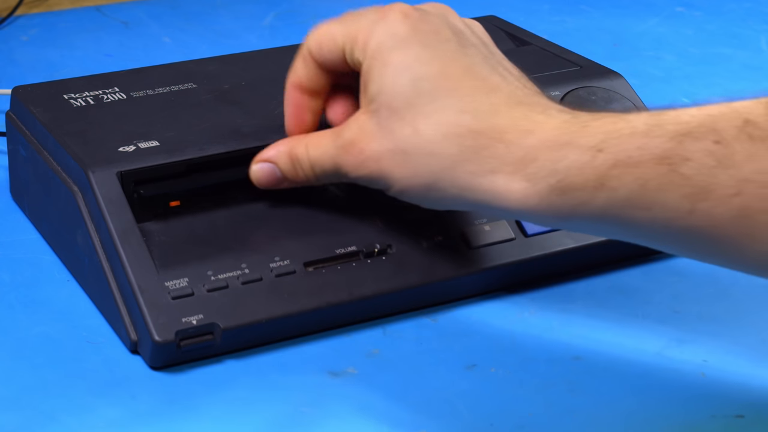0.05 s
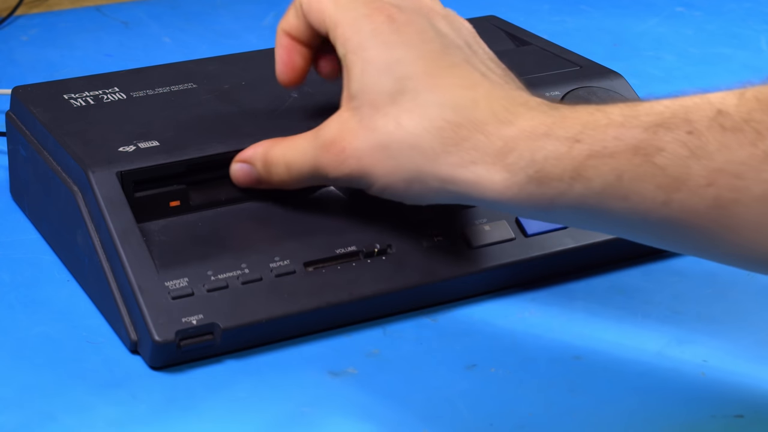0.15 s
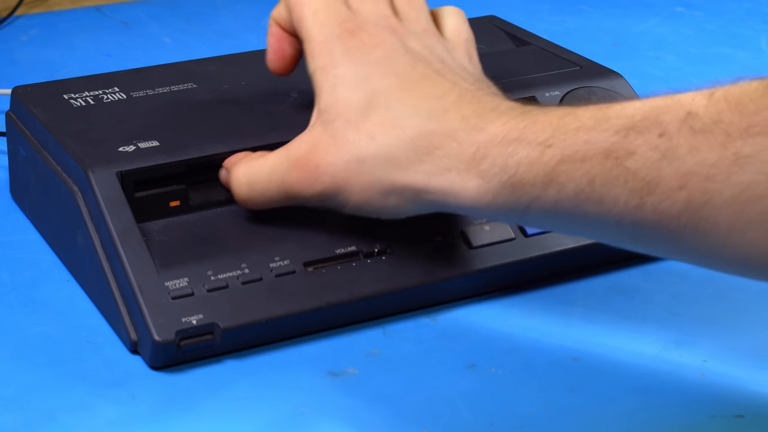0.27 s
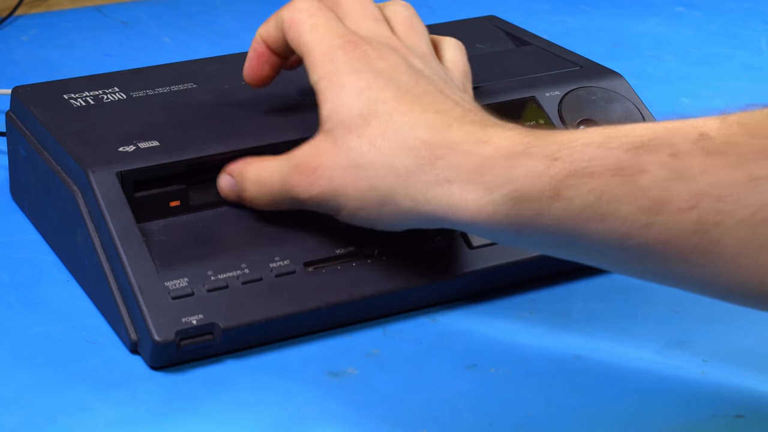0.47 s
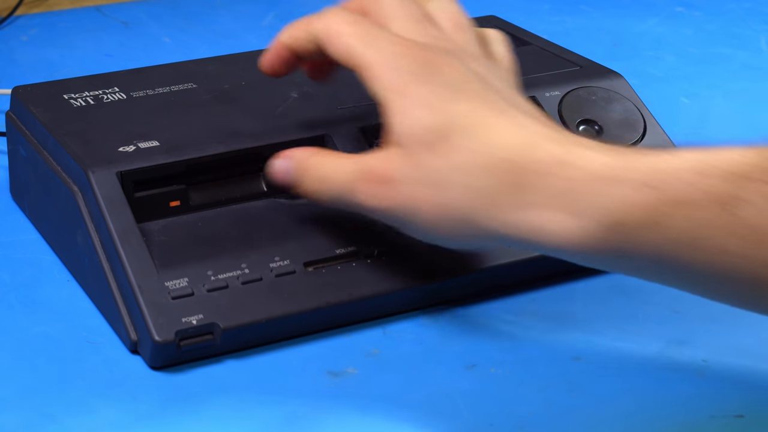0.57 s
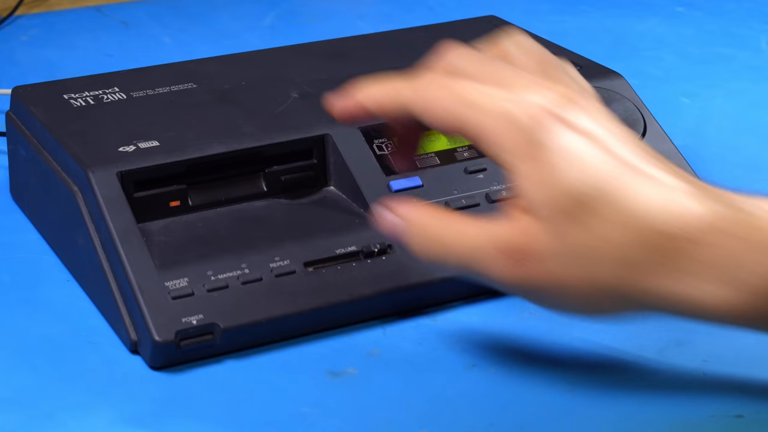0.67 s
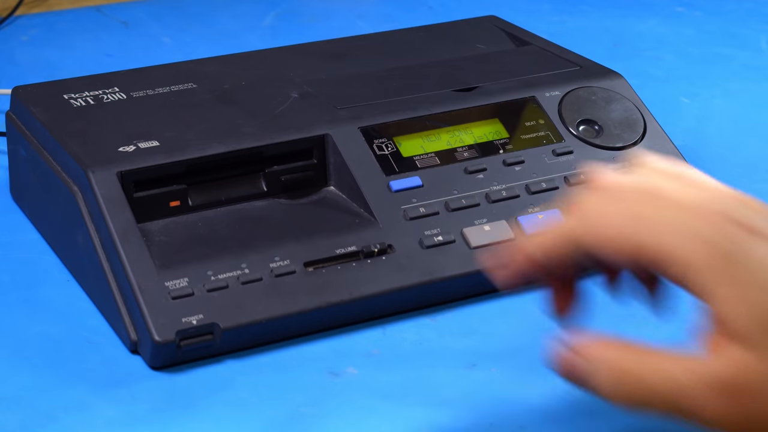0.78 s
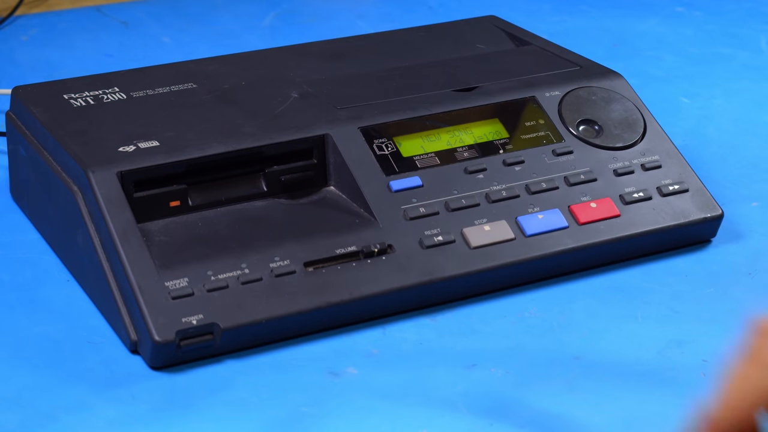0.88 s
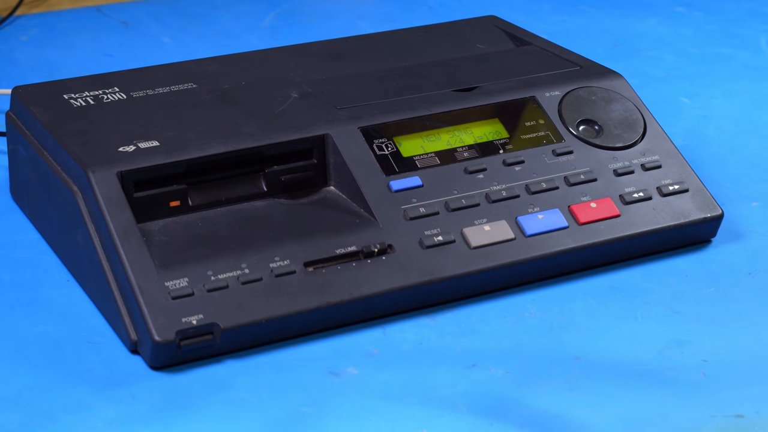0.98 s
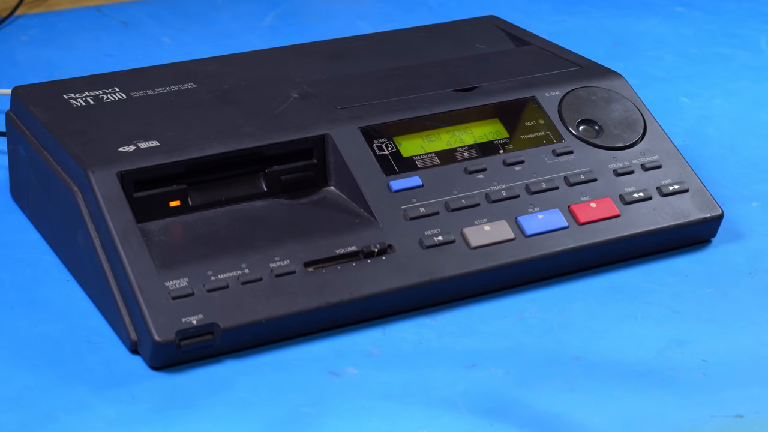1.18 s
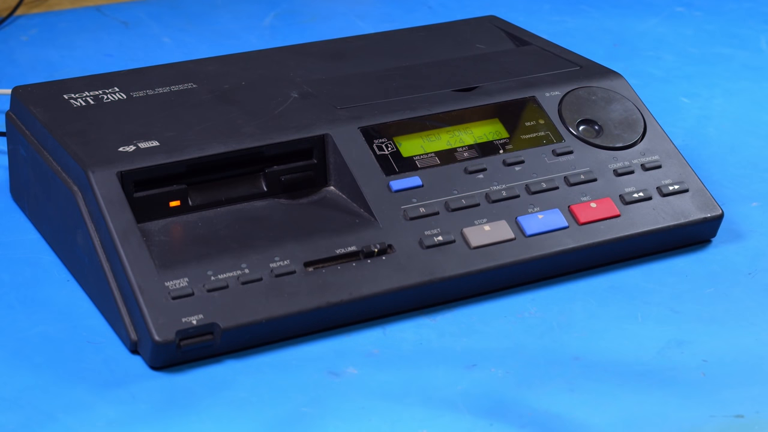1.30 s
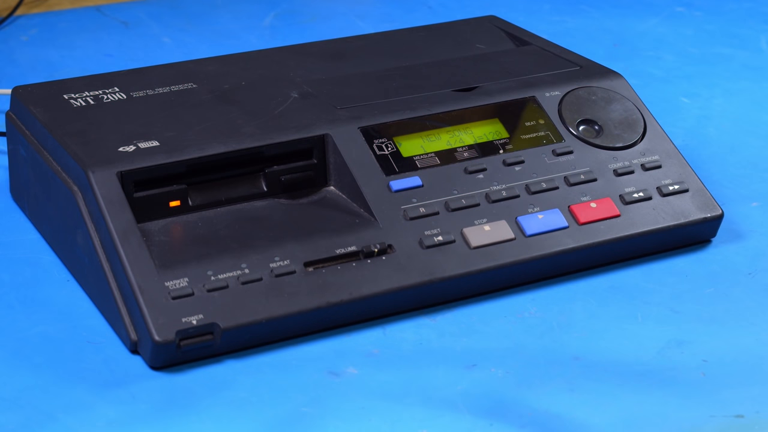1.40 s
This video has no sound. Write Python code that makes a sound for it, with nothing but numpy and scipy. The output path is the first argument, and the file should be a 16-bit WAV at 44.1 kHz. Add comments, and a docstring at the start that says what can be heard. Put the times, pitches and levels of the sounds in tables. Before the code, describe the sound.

Close by in a small quiet room, a floppy disk scrapes into a drive and locks with a sharp clack and a smaller click. A faint spinning hum follows, then a light clunk and quick, quiet stepping buzzes.

```python
"""A small quiet room, close to a plastic desktop unit, over the rumble of a wobbling microphone stand.
A floppy disk rubs and knocks into the drive, its shutter pings open, the carrier drops it into
place with a clack that rings the case, and the eject button clicks out. The spindle hums and the
disk swishes in its sleeve. Then the head clunks in and its motor steps in a few short bursts."""
import sys
import numpy as np
from scipy import signal
from scipy.fft import rfft, irfft
from scipy.io import wavfile

SR = 44100
rng = np.random.default_rng(int(sys.argv[2]) if len(sys.argv) > 2 else 0)


def persist_wave(psi):
    """Save psi, clipped to +-1, as 16-bit WAV."""
    counts = np.round(np.clip(psi, -1, 1) * 32767).astype(np.int16)
    wavfile.write(sys.argv[1], SR, np.atleast_2d(counts).T)


N = 63945
ATTACK_S = .00065  # onset of a hard contact


def undb(db):
    """Decibels to gain."""
    return 10 ** (np.asarray(db) / 20)


def unit(x):
    """Scale to rms 1."""
    return x / np.sqrt(np.mean(x ** 2))


def since(start):
    """Seconds since a moment, zero before it."""
    return np.maximum(np.arange(N) / SR - start, 0)


def fade(t, t60):
    """Exponential decay, 60 dB in t60 seconds."""
    return np.exp(-np.log(1000) * t / np.maximum(t60, 1e-3))


def fader(points):
    """Gain over time from (s, dB) points, opening in the 50 ms before the first."""
    s, db = np.array(points).T
    return undb(np.interp(since(0), s, db)) * np.clip(1 + (since(0) - s[0]) * 20, 0, 1)


def bins():
    """Frequencies of the spectrum in Hz."""
    return np.maximum(np.fft.rfftfreq(N, 1 / SR), 1)


def eq(points):
    """Gain across the spectrum from (Hz, dB) points."""
    hz, db = np.array(points).T
    return undb(np.interp(np.log(bins()), np.log(hz), db))


def peak(hz, width_hz):
    """Spectrum of one resonance."""
    return 1 / (1 + (2 * (bins() - hz) / width_hz) ** 2)


def noise(gain):
    """Noise of rms 1 with the given spectrum."""
    return unit(irfft(gain * np.exp(2j * np.pi * rng.random(N // 2 + 1)), N))


def wavering(lines):
    """Narrow resonances fed by noise: tones that waver."""
    return noise(sum(undb(db) / np.sqrt(width) * peak(hz, width) for hz, width, db in lines))


def ring(gain, start, t60, slope=0):
    """Many close modes as dying noise; t60 holds at 2 kHz, and slope lets lower octaves last longer."""
    spectrum, t = rfft(noise(gain)), since(start)
    octave = np.clip(np.log2(bins() / 2000), -4, 3)
    out = 0
    for k in range(-4, 4):
        band = irfft(spectrum * np.maximum(1 - abs(octave - k), 0), N)
        out += band * fade(t, t60 * 2 ** (-k * slope))
    return out * (1 - np.exp(-t / ATTACK_S))


def modes(table, start, attack):
    """Decaying sines of alternating polarity, set off by one blow."""
    t = since(start)
    tones = sum((-1) ** k * undb(db) * np.sin(2 * np.pi * hz * t) * fade(t, t60)
                for k, (hz, db, t60) in enumerate(table))
    return tones * (1 - np.exp(-t / attack))


def knocks(table, colour):
    """Hard contacts on one part, each with its own weight of bass and treble."""
    out = 0
    for start, db, bass_db, treble_db, t60 in table:
        tilt = eq([(350, bass_db), (1800, 0), (9000, treble_db)])
        out += undb(db) * ring(eq(colour) * tilt, start, t60, slope=.22)
    return out


def rub(levels, colour, rough_db, grain_hz):
    """Friction noise that catches and slips."""
    grip = np.interp(since(0) * grain_hz, np.arange(N), rng.standard_normal(N))
    return fader(levels) * unit(noise(eq(colour)) * undb(rough_db * grip))


# Swells of the stand's rumble. Each row: time in seconds, level in dB.
RUMBLE = [(0, -49.5), (.07, -52), (.19, -55.5), (.3, -50), (.5, -47.5), (.6, -56.5), (.8, -55.5),
          (.87, -65), (1.45, -67.5)]
# Its sub-heavy tone. Each row: frequency in Hz, gain in dB.
RUMBLE_EQ = [(10, -13), (21, -1.5), (32, -8), (60, -16.5), (90, -29), (130, -37.5), (300, -52.5),
             (800, -87)]
# The low thump. Each row: pitch in Hz, level in dB, t60 in seconds.
THUMP_MODES = [(22.2, -37, 0.9), (48, -33.5, .2), (64, -32.5, 0.16), (84.6, -36, 0.2)]


def stand_rumble():
    """Low rumble of a wobbling microphone stand, with a thump under the clack."""
    return fader(RUMBLE) * noise(eq(RUMBLE_EQ)) + modes(THUMP_MODES, start=.2, attack=.006)


# Dark room tone. Each row: frequency in Hz, gain in dB.
AIR_EQ = [(30, 0), (70, -2), (140, -12), (400, -11), (700, -24), (1500, -32), (5000, -33), (16000, -37)]


def air():
    """Still air lays a faint, steady bed of noise."""
    return undb(-77.5) * noise(eq(AIR_EQ))


# Fader ride of the hum. Each row: time in seconds, level in dB.
HUM = [(0, -69), (.3, -62.5), (.5, -62.5), (.7, -70), (.85, -71), (.92, -77), (1.05, -75.5), (1.45, -79.5)]
# Its low tones. Each row: pitch in Hz, width in Hz, relative level in dB.
HUM_LINES = [(249, 16, -7), (287, 18, -7), (354.6, 8.2, 0), (398, 18, -11.5), (460, 23, -11.5)]


def spindle_hum():
    """The spindle hums in a wavering cluster of tones."""
    return fader(HUM) * wavering(HUM_LINES)


# Ticks in the slot. Each row: start in seconds, level, bass and treble in dB, t60 in seconds.
SLOT_KNOCKS = [(.0005, -54, -14, -4.5, 0.088), (.0275, -42.5, -10.5, 9, 0.049), (.0335, -44, -4, -2, 0.028),
               (.0438, -36, -4.5, -5, 0.025), (.0475, -44.5, -0.5, -3.5, 0.062),
               (.1125, -69.5, -0.5, 14.5, 0.017), (.1288, -51.5, -2.5, -1.5, 0.048),
               (.183, -47, -5.5, -15, 0.019), (.1895, -50, -2, -25.5, .04), (.358, -64.5, -21, -27, .09),
               (.488, -65, -14.5, 1, .05), (.502, -64.5, 8.5, -14, 0.066)]
# The disk sliding and settling. Each row: time in seconds, level in dB.
SLIDE = [(0, -55.5), (.06, -54), (.1, -59), (.122, -67), (.15, -60), (.175, -64), (.2, -55.5), (.27, -60),
         (.3, -84), (.35, -68), (.46, -77), (.52, -130)]
# Boxy tone of the slot. Each row: frequency in Hz, gain in dB.
SLOT_EQ = [(100, -16), (200, -17), (320, 5), (600, -2.5), (1100, -4.5), (1800, -12), (2500, -9),
           (4000, -16), (7500, -16), (10000, -23), (16000, -28.5)]


def insertion():
    """The disk rubs and knocks along the slot; its metal shutter pings open."""
    ping = undb(-50) * ring(peak(14800, width_hz=1400), start=.1295, t60=.028)
    return rub(SLIDE, SLOT_EQ, rough_db=2, grain_hz=399) + knocks(SLOT_KNOCKS, SLOT_EQ) + ping


# Hits of the carrier. Each row: start in seconds, level, bass and treble in dB, t60 in seconds.
CLACKS = [(.1998, -41, -3, 3, .03), (.2042, -25, -3, -2, .022), (.2072, -17.5, -4, 3, .02),
          (.2098, -17.5, -1, 2, .021), (.2145, -33, 3, -6, .06), (.232, -49, 0, 3, .06),
          (.25, -58, 0, 0, .06), (.267, -58, 3, -3, .04)]
# Their full, bright tone. Each row: frequency in Hz, gain in dB.
CLACK_EQ = [(100, -11), (220, -3.5), (420, -0.5), (750, -7), (1300, -3), (2500, -4), (4500, -11.5),
            (8000, -3.5), (9800, -12.5), (15500, -13.5)]
# Ring of carrier and case. Each row: pitch in Hz, level in dB, t60 in seconds.
CASE_MODES = [(190, -42, .1), (274, -26.5, .105), (335, -35, .08), (420, -27, .08), (478, -34, .06),
              (596, -35, .07), (680, -38, .08), (826, -34.5, .08), (1078, -36, .07), (1278, -33.5, .07),
              (1670, -38, .05), (2305, -36, .06), (3010, -39, .07), (7740, -38, .04)]


def carrier_clack():
    """The disk carrier snaps down and rings the case."""
    return knocks(CLACKS, CLACK_EQ) + modes(CASE_MODES, start=.2095, attack=.002)


# Swells of the swish. Each row: time in seconds, level in dB.
SWISH = [(.2, -96), (.5, -83.5), (.68, -79), (.82, -78), (.87, -88.5), (.92, -96), (.96, -79), (1.2, -83.5),
         (1.32, -87.5), (1.45, -84)]
# Its tone, with a thin peak near 4 kHz. Each row: frequency in Hz, gain in dB.
SWISH_EQ = [(500, 2.5), (1200, -6), (2400, -6), (3600, -9), (3900, -5), (4130, 4.5), (4400, -5.5),
            (4800, -12), (8000, -12), (16000, -20)]


def disk_swish():
    """The turning disk brushes its sleeve."""
    return rub(SWISH, SWISH_EQ, rough_db=1, grain_hz=80.1)


# Button clicks. Each row: start in seconds, level, bass and treble in dB, t60 in seconds.
BUTTON_CLICKS = [(.384, -54.5, -10, 6.5, 0.046), (.3875, -49, 2, 23, 0.034), (.3905, -41.5, 2, 12.5, 0.026),
                 (.3962, -45, -12, 13, 0.045), (.4015, -43, -8, -8, 0.017), (.406, -50, -12, -1, 0.017),
                 (.4085, -33.5, -4.5, -0.5, 0.02), (.414, -42, 7.5, -3.5, 0.049)]
# Their hollow tone. Each row: frequency in Hz, gain in dB.
BUTTON_EQ = [(120, -28), (390, 4.5), (600, -16.5), (1400, -4.5), (1800, -9.5), (2350, -1), (3400, -13),
             (5500, -9.5), (7600, -4), (9300, -20.5), (16000, -33.5)]
# Ring of the catch. Each row: pitch in Hz, level in dB, t60 in seconds.
BUTTON_MODES = [(379, -49, 0.081), (808, -54, 0.047), (1030, -54, 0.057), (2186, -41.5, 0.025),
                (2430, -63, 0.034), (10040, -69, 0.078)]


def eject_button():
    """The button springs out, scraping, and rings as it catches."""
    return knocks(BUTTON_CLICKS, BUTTON_EQ) + modes(BUTTON_MODES, start=.4085, attack=ATTACK_S)


# Knocks of the head. Each row: start in seconds, level, bass and treble in dB, t60 in seconds.
HEAD_KNOCKS = [(1.0475, -65.5, -4, 7, 0.035), (1.0522, -48.5, -5, -10, 0.041),
               (1.0588, -44, -4.5, -4, 0.035), (1.065, -54.5, 0, -4, 0.065), (1.091, -59, 12, -17.5, 0.11)]
# Their mid-heavy tone. Each row: frequency in Hz, gain in dB.
HEAD_EQ = [(120, -8.5), (300, -6), (500, 0), (1000, -3.5), (2000, -10), (2700, -13), (3300, -4),
           (4200, -16), (8000, -20), (15000, -31)]
# Body of the clunk. Each row: pitch in Hz, level in dB, t60 in seconds.
HEAD_MODES = [(66, -57, 0.27), (235.1, -44, 0.098), (278.3, -45, 0.16), (322.8, -37.5, 0.11),
              (381, -41.5, 0.12), (915, -51, 0.056), (1747, -61.5, 0.13), (3190, -55, .05)]


def head_clunk():
    """The head mechanism engages with a double clunk."""
    return knocks(HEAD_KNOCKS, HEAD_EQ) + modes(HEAD_MODES, start=1.0495, attack=.0061)


# Fader ride of the head's rubbing. Each row: time in seconds, level in dB.
HEAD_RUB = [(1.04, -110), (1.09, -78), (1.29, -78), (1.35, -84), (1.385, -75), (1.45, -80)]
# Its muffled tone. Each row: frequency in Hz, gain in dB.
HEAD_RUB_EQ = [(200, -3), (450, 3), (1000, -1), (2500, -9), (6000, -27.5), (16000, -41)]


def head_rub():
    """The head rubs on the turning disk."""
    return rub(HEAD_RUB, HEAD_RUB_EQ, rough_db=2, grain_hz=100.5)


# Swell of the whine. Each row: time in seconds, level in dB.
WHINE = [(1.06, -85), (1.095, -77), (1.29, -77), (1.315, -95), (1.45, -100)]
# Its two tones. Each row: pitch in Hz, width in Hz, relative level in dB.
WHINE_LINES = [(655, 45, -2), (974, 24, 1)]


def load_whine():
    """The drive whines thinly under load."""
    return fader(WHINE) * wavering(WHINE_LINES)


# Bursts of steps. Each row: start in seconds, relative level in dB.
SEEKS = [(1.1197, -60), (1.1525, -61), (1.1855, -62), (1.215, -64), (1.242, -69), (1.257, -66)]
# Ring of the head sled. Each row: pitch in Hz, relative level in dB, t60 in seconds.
STEP_MODES = [(355, -15, .06), (655, 1, .03), (800, -4, .02), (972, 0, .04), (1180, -4, .025),
              (1820, -2, .02), (2620, -1, .02), (4730, -7, .04), (5180, -11, .04), (5500, -11, .04),
              (6910, -10, .04)]
# The sled sliding. Each row: time in seconds, level in dB.
SLED = [(1.117, -103), (1.127, -75.5), (1.21, -74.5), (1.275, -79.5), (1.31, -84), (1.36, -101.5)]
# Raspy tone of sled and screw. Each row: frequency in Hz, gain in dB.
SLED_EQ = [(300, -9), (800, -2), (1400, -9), (2600, -5), (3800, -9), (7200, -5), (10000, -15), (16000, -21)]


def stepper(count=9, step_hz=324, fade_s=.016, jitter=.02, roughness=.35):
    """Fading trains of motor steps ring the sliding head sled; the lead screw rasps with each train."""
    pulses, rasp = np.zeros(N), 0
    for start, db in SEEKS:
        lag = (np.arange(count) + jitter * rng.standard_normal(count)) / step_hz
        pulses[((start + lag) * SR).astype(int)] += undb(db) * np.exp(-lag / fade_s)
        rasp += undb(db - 8.5) * ring(eq(SLED_EQ), start, t60=.11)
    grit = signal.fftconvolve(pulses, fade(since(0), t60=.008))[:N] * rng.standard_normal(N)
    push = pulses + roughness * np.std(pulses) * unit(grit)
    buzz = undb(-4.5) * signal.fftconvolve(push, modes(STEP_MODES, start=0, attack=1e-4))[:N]
    return buzz + rasp + rub(SLED, SLED_EQ, rough_db=3, grain_hz=190.6)


def room(x, wet_db=-22.5):
    """Short reverberation of a small room."""
    colour = eq([(60, -10.5), (350, 1.5), (1000, 1), (7500, 1), (15000, -9)])
    tail = ring(colour, start=.0029, t60=.31, slope=.11)
    return x + undb(wet_db) * signal.fftconvolve(x, tail / np.sqrt(np.sum(tail ** 2)))[:N]


def scene():
    """The mechanism in its room, over the dry sounds of spinning, stand rumble and air; mono."""
    bed = stand_rumble() + air()
    mechanism = insertion() + carrier_clack() + eject_button() + head_clunk() + stepper() + head_rub()
    return (room(mechanism) + spindle_hum() + load_whine() + disk_swish() + bed)[None]


def record(dry, top_hz=16100):
    """A steep low-pass trims the highest treble."""
    return signal.sosfilt(signal.ellip(10, .2, 70, top_hz, fs=SR, output="sos"), dry)


dry = scene()
out = record(dry)
persist_wave(out)
```